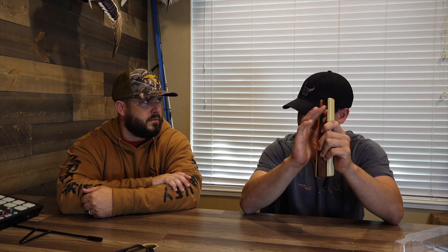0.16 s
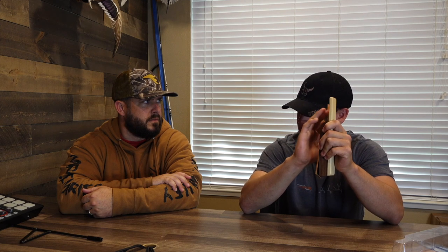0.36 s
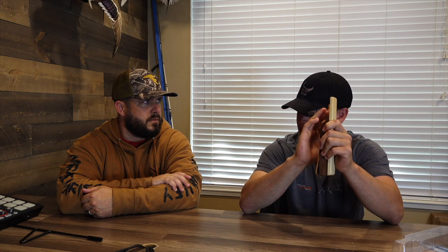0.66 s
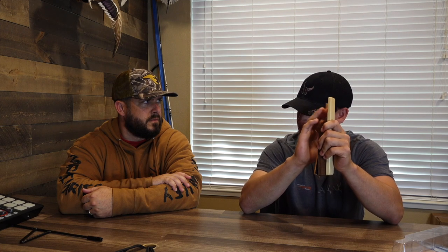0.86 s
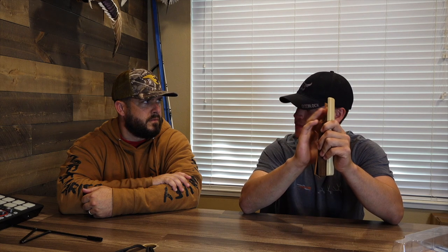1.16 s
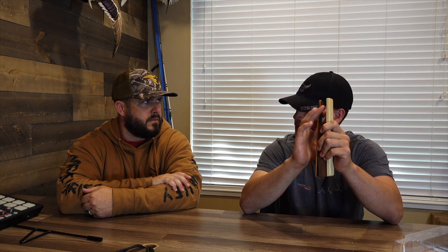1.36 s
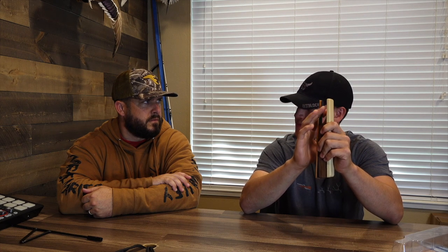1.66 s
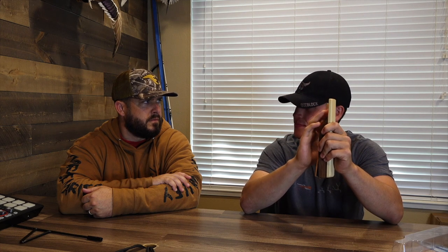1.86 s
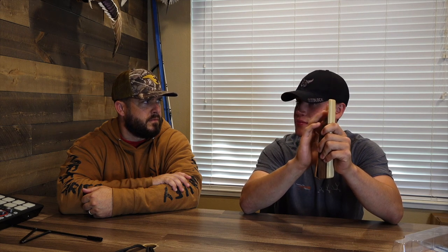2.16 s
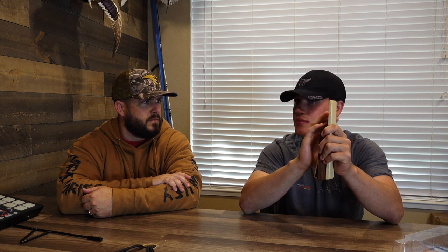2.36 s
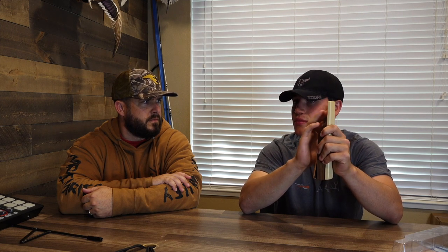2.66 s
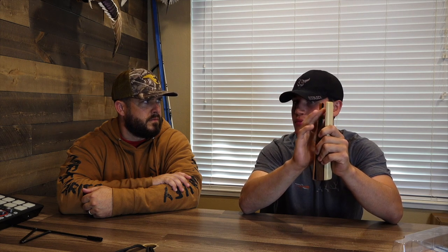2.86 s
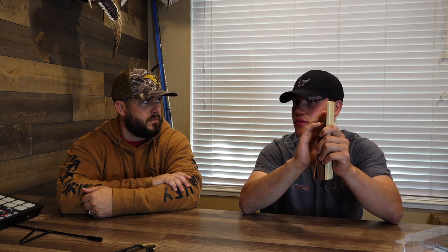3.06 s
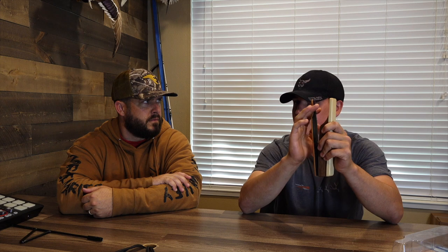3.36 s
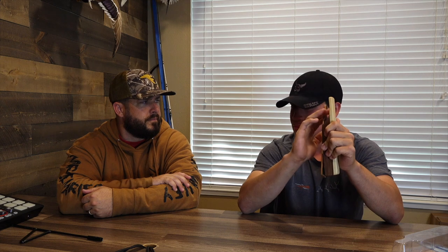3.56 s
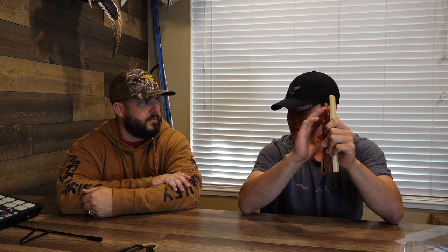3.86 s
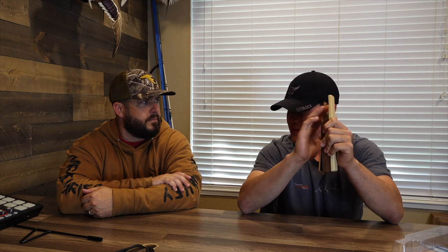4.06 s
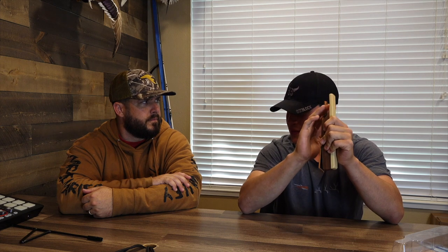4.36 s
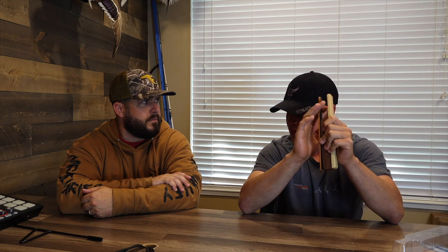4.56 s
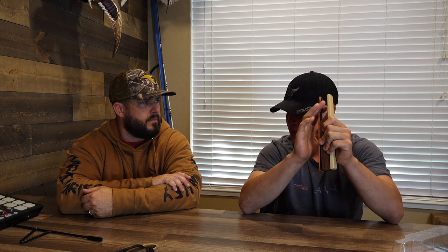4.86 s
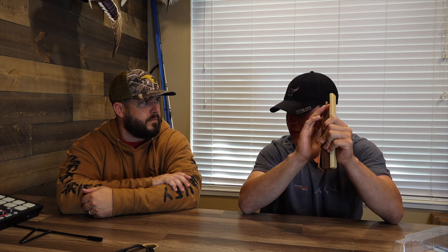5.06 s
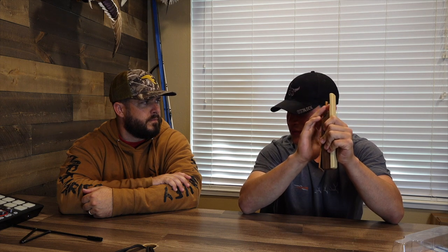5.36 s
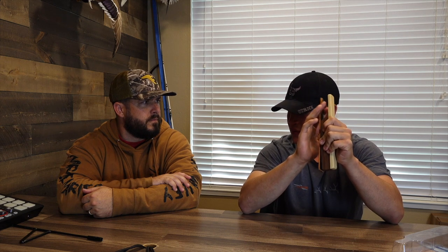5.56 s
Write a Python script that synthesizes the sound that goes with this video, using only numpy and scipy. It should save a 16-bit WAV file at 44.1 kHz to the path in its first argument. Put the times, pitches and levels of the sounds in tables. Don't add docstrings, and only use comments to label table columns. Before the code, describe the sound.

Indoors at a table, a hand strokes a wooden box call about three times a second. Each yelp starts clear and high, jumps up, then cracks into a lower raspy note. After eleven strokes there is a short pause with a light wooden touch, then eight more. Faint chalk scrapes and squeaks fill the gaps over low ventilation rumble, picked up by a recorder with automatic gain.

```python
import sys
import numpy as np
from scipy import signal
from scipy.fft import rfft, irfft, next_fast_len
from scipy.io import wavfile
from scipy.ndimage import uniform_filter1d, minimum_filter1d, map_coordinates

SR = 44100
rng = np.random.default_rng(int(sys.argv[2]) if len(sys.argv) > 2 else 0)


def field_ratio(decibels):
    return 10 ** (np.asarray(decibels, dtype=float) / 20)


def log_audio(samples):
    frames = np.atleast_2d(samples).T
    limited = np.clip(frames, -1, 1)
    pcm = np.round(limited * 32767).astype(np.int16)
    wavfile.write(sys.argv[1], SR, pcm)


N = 251811

# centre_hz, width_hz, level_db
BLADE = [(5827, 590, -18), (6510, 280, -25.5), (7290, 560, -25), (8470, 520, -24), (9250, 140, -26.5),
         (10030, 260, -33.5), (11790, 140, -30.5), (14000, 1700, -47.5)]
# start_s, clear_hz, jump_after_s, break_after_s, low_hz
JUMPING = [(0.038, 800, 0.037, 0.065, 639.8), (0.336, 794, 0.037, 0.059, 652.6),
           (0.623, 775.3, .038, 0.073, 641.2), (0.929, 798.4, 0.026, 0.068, 703.5),
           (1.22, 787, .041, .074, 648.9), (1.52, 819.4, .036, .076, 647.6),
           (1.818, 830.7, .03, 0.062, 658.9), (2.116, 790, 0.034, 0.054, 808.8),
           (2.415, 767.6, 0.033, 0.071, 649), (2.729, 796.6, 0.045, 0.075, 685.2),
           (3.031, 799.2, .042, .065, 635.7), (4.755, 824, 0.028, 0.063, 668),
           (5.063, 869.6, 0.016, 0.044, 649.2), (5.369, 872.4, 0.017, 0.055, 652.5),
           (5.672, 829, .022, 0.074, 674)]
# start_s, clear_hz, slide_after_s, settled_after_s, low_hz
SLIDING = [
    (3.505, 776.5, 0.051, .07, 733),
    (3.829, 771.7, .05, .072, 639.3),
    (4.133, 794.5, .046, .068, 632.5),
    (4.437, 804, 0.032, 0.044, 632),
]


def unit(x):
    return x / np.sqrt(np.mean(x ** 2) + 1e-20)


def along(points, hz):
    f, value = np.transpose(points)
    return np.interp(np.log(hz + 1), np.log(f + 1), value)


def wobble(rate):
    knots = rng.standard_normal(int(N * rate / SR) + 4)
    fine = np.arange(0, len(knots) - 1, 1 / 8)
    return np.interp(np.arange(N) * rate / SR, fine, map_coordinates(knots, [fine]))


def filtered(x, response):
    m = next_fast_len(N + SR // 2)
    spectrum = rfft(x, m) * response(np.fft.rfftfreq(m, 1 / SR))
    return irfft(spectrum, m)[..., :N]


def held(call, follow_s, knee_db, slope):
    keep = np.exp(-1 / (follow_s * SR))
    power = signal.lfilter([(1 - keep) ** 2], [1, -2 * keep, keep ** 2], call ** 2)
    return (1 + power / field_ratio(knee_db)) ** -slope


def air(call):
    # freq_hz, level_db
    rumble_curve = [(15, -48.5), (25, -24.5), (43, 3), (86, -2.5), (160, -8), (193, -12), (247, -10),
                    (393, -22.5), (426, -21.5), (516, -21.5), (650, -33), (840, -36), (1430, -120)]
    # freq_hz, level_db
    hiss_curve = [(410, -39), (700, 4), (1420, -19.5), (2660, -10), (3140, -18), (3610, -10.5),
                  (15000, -44)]
    # time_s, level_db
    vent_level = [(0, -46.5), (.6, -47), (2, -49.5), (3.2, -53), (3.45, -46), (4.5, -45.5), (5.7, -48)]
    vent_db = np.interp(np.arange(N) / SR, *np.transpose(vent_level))
    swell = field_ratio(2.0 + vent_db + wobble(5.4))
    rumble = swell * unit(filtered(rng.standard_normal(N), lambda f: field_ratio(along(rumble_curve, f))))
    hiss = field_ratio(-63) * unit(filtered(rng.standard_normal(N), lambda f: field_ratio(along(hiss_curve, f))))
    return field_ratio(1.0) * rumble * held(call, follow_s=0.01, knee_db=-25, slope=0.9) + hiss


def room(x):
    # freq_hz, t60_s, level_db
    room_decay = [(600, 0.31, -15), (900, 0.4, -5), (1360, 0.25, -2), (3420, 0.23, 4), (6000, 0.22, 2),
                  (12000, 0.25, -3)]
    wet, step = np.zeros(N + 2 * SR), SR // 3
    hz, t60, db = np.transpose(room_decay)
    for start in range(0, N, step):
        f, t, z = signal.stft(rng.standard_normal(SR // 2), SR, nperseg=256)
        t60_at_f = along(list(zip(hz, t60)), f)[:, None]
        fade_db = along(list(zip(hz, db)), f)[:, None] - 60 * t / t60_at_f
        tail = signal.istft(z * field_ratio(fade_db), SR, nperseg=256)[1] / np.sqrt(.025 * SR)
        tail = tail * (1 - np.exp(-np.arange(len(tail)) / (0.0095 * SR)))
        part = signal.fftconvolve(x[start:start + step], tail)
        wet[start + 200:][:len(part)] += part
    return wet[:N]


def modes(table, f):
    total = 0
    for k, (centre, width, db) in enumerate(table):
        resonance = 1j * f * width / (centre * centre - f * f + 1j * f * width)
        total = total + (-1) ** k * field_ratio(db) * resonance
    return total


def radiated(f):
    s = 1j * f / 560
    dip = 1 - 0.43 * modes([(1190, 26, 0.0068)], f)
    soft = 1 / (1 + 1j * f / 11000)
    return soft * dip * (s * s / (s * s + 1.167 * s + 1)) ** 2


def ring(drive, table, wander_db):
    out = np.zeros(N)
    for k, (hz, width, db) in enumerate(table):
        strength = (-1) ** k * field_ratio(db + wander_db * wobble(21.967))
        out += strength * signal.lfilter(*signal.iirpeak(hz, hz / width, SR), drive)
    return out


def box(drive, bright_db=0, rasp=0, sheen_db=0, cavity_db=0, fresh=0):
    # centre_hz, width_hz, level_db
    air_modes = [(790, 36, -12)]
    # centre_hz, width_hz, level_db
    box_modes = [(1056, 154, -14), (1407, 215, 1), (1700, 477, -1), (2154, 351, 1.5)]
    # centre_hz, width_hz, level_db
    wall_modes = [(2297, 990, -5.5), (3195, 333, -2), (4054, 315, -11), (5070, 190, -55)]
    rasp_top_hz, rasp_top_db = 9000, -14
    cavity = field_ratio(cavity_db - 12.7 * rasp) * ring(drive, air_modes, wander_db=5.5)
    low = cavity + ring(drive, box_modes, wander_db=1.5)
    mid = field_ratio(bright_db + .3 * sheen_db) * ring(drive, wall_modes, wander_db=2)
    top = field_ratio(1.0 * bright_db - 3.1 * rasp + sheen_db - 4) * ring(drive, BLADE, wander_db=4)
    sound = filtered(low + mid - top, radiated)
    edge = filtered(sound, lambda f: 1 / (1 + (rasp_top_hz / (f + 1)) ** 4))
    return sound - (1 - field_ratio(rasp_top_db * (np.sqrt(rasp) + fresh))) * edge


def ticks():
    # time_s, peak_db
    touches = [
        (3.381, -31),
        (3.397, -42),
        (3.41, -50),
    ]
    # start_s, end_s, pitch_hz, level_db
    squeaks = [(1.127, 1.24, 433, -51.5), (1.16, 1.228, 880, -50), (1.34, 1.47, 428, -48.5),
               (1.457, 1.538, 558, -48), (3.692, 3.8, 575, -51), (4.03, 4.136, 504, -53)]
    scrape_levels = [-52, -55, -53.5, -55.5, -57.5, -55, -63, -59, -57.5, -60, -71, -54.5, -52.5, -49, -49,
                     -50, -53, -52]
    t, touch, squeak, scrape = np.arange(N) / SR, np.zeros(N), np.zeros(N), np.zeros(N)
    noise = rng.standard_normal(N)
    waver = np.cumsum(1 + 0.021 * wobble(44)) / SR

    def arch(start, end):
        return np.sin(np.pi * np.clip((t - start) / (end - start), 0, 1))

    for s, db in touches:
        touch += field_ratio(db - 60 * np.clip(t - s, 0, 1) / 0.087) * (t >= s) * noise
    touch += field_ratio(-34.5 - 60 * t / 0.14) * noise
    for start, end, hz, db in squeaks:
        squeak += field_ratio(db) * arch(start, end) * np.sin(2 * np.pi * hz * waver)
    for (start, *_), db in zip(sorted(JUMPING + SLIDING), scrape_levels):
        scrape += field_ratio(db) * field_ratio(5.5) * arch(start + 0.026, start + 0.26)
    swish = unit(filtered(rng.standard_normal(N), lambda f: modes(BLADE, f) * (f / 8000) ** 0.5))
    return box(touch, 4.24) + squeak + scrape * field_ratio(1.9 * wobble(60)) * swish


def stroke(kind, start, clear, turn, drop, low, db, length, fade, edge_db, grain):
    stage_levels = [1.5, 2, -3, 2.5, -0.5, -0.5, 1]
    stage_sharpness = [-9, 4, -2.5, -3.5, -1, -2.5, 2]
    bite_ratio, settle_s, creep, slide_sag = 1.075, 0.012, 1.015, 0.95
    high_hz, high_hold_s, high_sag, land_s = 922.6, .012, .92, .014
    clear_rasp, high_rasp, break_rasp, slide_rasp = 0.041, 0.122, 0.542, 0.25
    low_rasp, flip_rasp, end_rasp = 0.11, 0.261, .5
    flip_s, rise_s, flip_ratio, resag_s = 0.02784, 0.01026, 1.045, .045
    short_s, flick_s, flick_db = .15, .016, -10
    slide_cavity_db = -5
    quick = .002

    bite, settled, late, high, crack, deep, flip = zip(stage_levels, stage_sharpness)
    rows = [(0, bite_ratio * clear, clear_rasp, *bite), (settle_s, clear, clear_rasp, *settled)]
    if kind == "jump":
        rows += [(turn, creep * clear, clear_rasp, *late),
                 (turn + quick, high_hz, high_rasp, *high),
                 (min(turn + high_hold_s, drop - quick), high_hz, 2 * high_rasp, *high),
                 (drop, high_sag * high_hz, break_rasp, *crack),
                 (drop + quick, 1.07 * low, 0.658 * break_rasp, *crack)]
    else:
        rows += [(turn, slide_sag * clear, clear_rasp, *late), (drop, 1.02 * low, slide_rasp, *high)]
    rows += [(drop + land_s, low, low_rasp, *deep),
             (drop + flip_s, 1.005 * low, 2 * low_rasp, *flip),
             (drop + flip_s + rise_s, flip_ratio * low, flip_rasp, *deep)]
    end = max(length, drop + flip_s + rise_s + 2 * quick)
    rows += [(min(drop + flip_s + resag_s, end - quick), low, end_rasp, *flip),
             (end, 1.025 * low, end_rasp, *deep)]
    if length < short_s:
        rows = [r for r in rows if r[0] < length - flick_s]
        rows += [(length - flick_s, low, flip_rasp, *deep), (length, high_hz, end_rasp, flick_db, high[1])]
        end = length
    s, hz, rasp, stage_db, sharp_db = np.transpose(rows)
    fading = np.clip((s - drop) / (end - drop), 0, 1) ** 2.5
    level_db = db + stage_db + fade * fading
    sharp_db = sharp_db + edge_db * (s <= turn)
    cavity_db = 0 * s + slide_cavity_db * (kind == "slide")
    return np.transpose([start + s, hz, level_db, grain * rasp, sharp_db, cavity_db])


def strokes():
    # level_db, length_s, end_fade_db, clear_sharpness_db, rasp_ratio
    hand_moves = [(-10, .18, -12, 5.5, 0.772), (-9, .18, -15.5, 2, 0.835), (-9, .18, -12.5, 3.5, 0.88),
                  (-10, .17, -14, 4, 0.78), (-10, .18, -15.5, 6, 0.832), (-9, .18, -13.5, 4, 0.778),
                  (-10, .18, -24.5, 4.5, 0.702), (-9.5, .18, -28, 3, 1.1), (-9.5, .18, -19, 6.5, 0.91),
                  (-10, .18, -22.5, 8.5, 0.894), (-10, .17, -31, 7.5, 1.221), (-10, .116, 5, 5.5, 0.35),
                  (-9.5, .18, -14, 1, .6), (-8, 0.27, -28.5, 2, 0.68), (-10, .18, -10, -3, 0.946),
                  (-8.5, .18, -13, 1.5, 1.1), (-8.5, .18, -12.5, 2.5, 0.727), (-10.5, 0.16, -4, 7.5, .9),
                  (-8, .18, -9.5, 1.5, 0.81)]
    kinds = sorted([(row, "jump") for row in JUMPING] + [(row, "slide") for row in SLIDING])
    return [stroke(kind, *row, *hand) for (row, kind), hand in zip(kinds, hand_moves)]


def lid():
    t = np.arange(N) / SR
    run = strokes()
    s, hz, db, rasp, bright, cavity_db = np.concatenate(run).T
    cavity_db = np.interp(t, s, cavity_db)
    hz, bright = np.interp(t, s, hz), np.interp(t, s, bright)
    rasp = np.clip(1.466 * np.interp(t, s, rasp), 0, 1)
    gain, snap, sheen_db, fresh = np.zeros((4, N))
    for rows in run:
        s, db = rows.T[[0, 2]]
        db = db - 25 * (s - s[0])
        snap += 0.05 * np.exp(-np.abs(t - s[0] + 0.0039) / 0.0036)
        sheen_db += 7 * np.exp(-((t - s[0] - .021) / .013) ** 2)
        fresh += 1.2 * np.exp(-((t - s[0]) / .011) ** 2)
        grip_s = [s[0] - .015, s[0] - .0042, *s, s[-1] + 0.024]
        grip_db = [db[0] - 60, db[0] - 36, *db, db[-1] - 30]
        gain += field_ratio(np.interp(t, grip_s, grip_db, -150, -150))

    jitter = rasp * (.06 * wobble(120) + 0.06867 * wobble(450))
    cycle = np.cumsum(hz * (1 + snap + 0.00809 * wobble(70) + jitter)) / SR
    at = np.interp(np.arange(1, int(cycle[-1])), cycle, np.arange(N))
    rough = np.interp(at, np.arange(N), rasp)
    limp = 1.1 * rough ** 2 * (-1) ** np.arange(len(at))
    size = field_ratio(limp + (.8 + 3.5 * rough) * rng.standard_normal(N)[:len(at)])

    taps = np.floor(at)[:, None] + np.arange(-7, 9)
    offset = taps - at[:, None]
    shape = np.sinc(offset) * np.cos(np.pi * offset / 16) ** 2
    places = np.clip(taps, 0, N - 1).astype(int).ravel()
    slips = np.bincount(places, (shape * size[:, None]).ravel(), N)

    grit = rng.standard_normal(N) * (0.17 + np.cos(np.pi * cycle) ** 4)
    share = .004 + .16 * rasp ** 1.5
    catch = field_ratio((1.4 + 3.35 * rasp) * wobble(90))
    drive = np.sqrt(1 - share) * unit(slips) + np.sqrt(share) * unit(grit)
    evened = np.sqrt(2 / (1 + field_ratio(2 * bright)))
    return field_ratio(-14.5) * unit(box(drive * catch * gain * evened, bright, rasp, sheen_db, cavity_db, fresh))


def scene():
    dry = lid() + ticks()
    call = dry + field_ratio(-1) * room(dry) * held(dry, follow_s=0.0086, knee_db=-31, slope=0.25)
    return (call + air(call))[None]


def top_cut(x):
    return signal.sosfilt(signal.butter(12, 15800, fs=SR, output="sos"), x)


def record(dry):
    need = np.minimum(1, .97 / (np.abs(dry) + 1e-9))
    gain = uniform_filter1d(minimum_filter1d(need, size=501, axis=1), size=401, axis=1)
    return top_cut(dry * gain)


dry = scene()
out = record(dry)
log_audio(out)
```